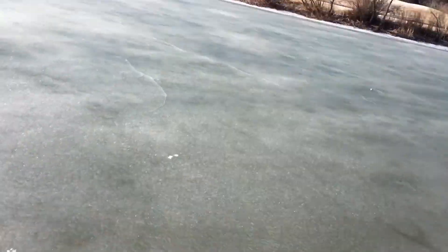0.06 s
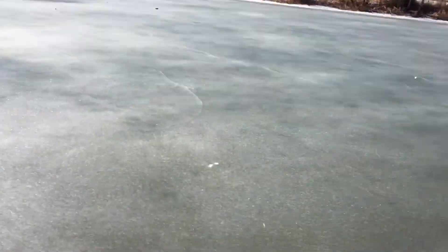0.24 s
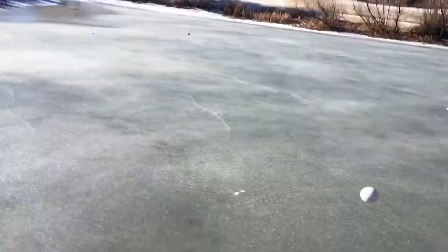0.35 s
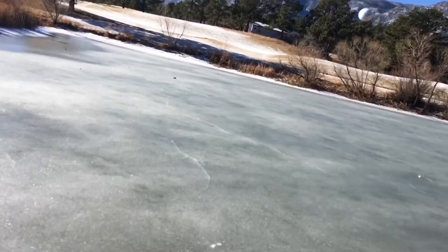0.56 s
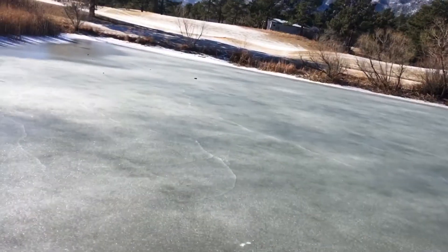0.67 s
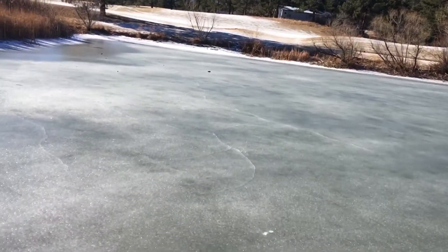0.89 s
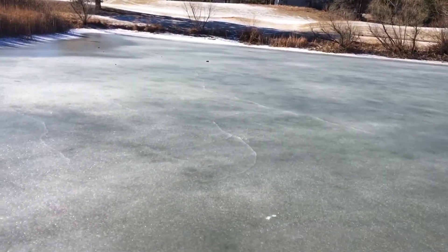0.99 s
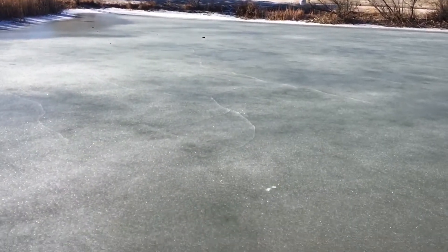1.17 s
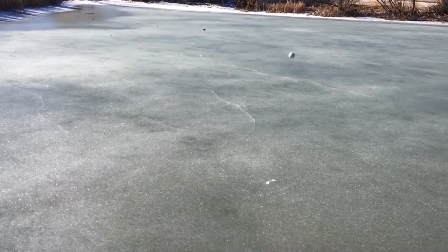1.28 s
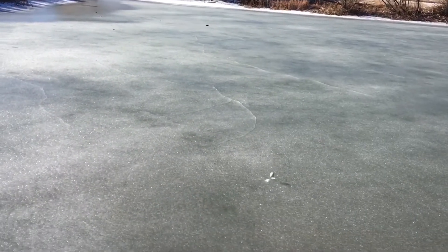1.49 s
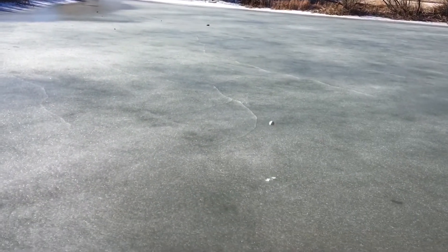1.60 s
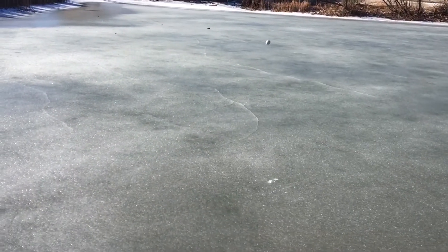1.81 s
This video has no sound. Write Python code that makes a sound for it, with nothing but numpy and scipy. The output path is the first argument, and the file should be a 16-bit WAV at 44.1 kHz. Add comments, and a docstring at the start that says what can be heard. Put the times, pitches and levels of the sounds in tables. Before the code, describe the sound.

A rock hits a frozen lake close by at 0.25 seconds, just after a soft arm swish: a hard crack and crunch with a low boom. Ice chips and tiny rising chirps scatter until 0.7 seconds, with light microphone knocks near 0.45. At 1.6 seconds the rock lands farther off with a quick falling pew, a crack and a short ring. Faint wind rumble and hiss continue throughout.

```python
"""Rock on a frozen lake

An arm swishes and a rock hits the ice close by: a hard crack and crunch, a low boom,
a scatter of chips and rising chirps. The rock bounces high and lands further off, where a falling
'pew', a bending wave carried treble first by the ice sheet, arrives just before the crack.
Light wind, a soft hiss and a few handling knocks reach the microphone."""
import sys
import numpy as np
from scipy import signal
from scipy.fft import rfft, irfft
from scipy.io import wavfile

SR = 44100
rng = np.random.default_rng(int(sys.argv[2]) if len(sys.argv) > 2 else 0)


def put_to_file(sound):
    """Save the sound as 16-bit audio at rate SR, in the file named by the first command-line argument."""
    columns = np.atleast_2d(sound).T  # one column per channel
    safe = np.clip(columns, -1, 1)
    whole_steps = np.round(safe * 32767)
    wavfile.write(sys.argv[1], SR, whole_steps.astype(np.int16))


N = 81585
T = np.arange(N) / SR

# wind rumble, distant air, crackly hiss, smooth hiss after the landing: f/Hz, level/dB
WIND_EQ = [(20, -31.5), (35, -10), (55, 1), (85, 0.5), (120, -16), (180, -16.5), (250, -33.5), (600, -41.5)]
AIR_EQ = [(100, -3), (350, 5), (700, -5.5), (1400, -3.5), (2400, -18), (3400, -19), (6000, -20.5),
          (16000, -23.5)]
HISS_EQ = [(200, 6.5), (1200, 0), (2400, -0.5), (3400, 0.5), (5000, -3), (6300, -2.5), (8000, -8),
           (10500, -9.5), (12000, -11.5), (16000, -9)]
LATE_HISS_EQ = [(150, 14), (350, 12), (700, 3), (1400, 0), (2400, -3), (3500, 2), (5000, -3), (6500, -2),
                (8500, -6), (12000, -6), (16000, -9)]
# puffs of wind: t/s, level/dB, half length/s
PUFFS = [(0.213, -34.5, 0.037), (0.937, -35, 0.012), (1.043, -47, 0.012), (1.114, -41.5, 0.019)]
# fader ride of the crackly hiss: t/s, level/dB
HISS_RIDE = [(0, -61), (.06, -58), (.085, -49.5), (.12, -54), (.22, -53), (.41, -61), (.46, -52.5),
             (.62, -53.5), (.7, -63), (.9, -66.5), (1.3, -76), (1.85, -76)]
# ticks of grit and ice chips: t/s, level/dB, f/Hz
TICKS = [(.08, -43.5, 5900), (0.2193, -22.5, 3300), (0.229, -33, 2940), (0.321, -29, 3020),
         (0.342, -40, 6000), (.556, -45.5, 2000), (.601, -43.5, 8000), (.627, -43.5, 8030),
         (.66, -50, 3530), (.8, -57, 4000), (.99, -56, 5000), (1.087, -53.5, 3486), (1.135, -55, 4540),
         (1.262, -58, 4540), (1.286, -55, 2980), (1.421, -52.5, 12100), (1.69, -45, 1100)]
# tone of one tick: multiple of its pitch, level/dB
TICK_EQ = [(.25, -26), (.7, 1), (1, 1), (1.9, -0.5), (3, -21.5)]
# air around the swinging arm: f/Hz, level/dB
SWISH_EQ = [(60, 3), (200, 5), (550, 0), (1000, -8), (2200, -13), (3500, -14), (7000, -20), (16000, -28)]
# rising chirps in the ice: t/s, level/dB, f/Hz, half length/s
ICE_CHIRPS = [(0.237, -35.5, 2540, 0.004), (0.337, -45, 3380, 0.0029), (.346, -45.5, 1480, 0.003),
              (0.378, -45, 2180, 0.0027), (.411, -50, 1670, 0.0027), (0.536, -47.5, 1210, 0.0049),
              (0.557, -40.5, 2000, .002), (0.566, -52, 5850, 0.0014), (.572, -45, 2900, 0.0014),
              (0.6104, -39.5, 4000, 0.00094), (.631, -41.5, 2510, .0022), (0.663, -48.5, 1860, 0.0015),
              (0.682, -49.5, 580, 0.0029)]
# the flutter that roughens them: f/Hz, level/dB
FLUTTER_EQ = [(100, -3), (600, -0.5), (1400, -11.5)]
# bending waves, each at its peak: t/s, level/dB, f/Hz, half length/s
BENDING_WAVES = [(0.2421, -5.5, 2230, 0.00054), (0.2456, -4.5, 417, 0.00087), (.2525, -12, 236, .002),
                 (.3208, -31, 1940, 0.00072), (1.5905, -4.5, 696, 0.0013), (1.5953, -24, 1300, .001),
                 (1.6085, -28.5, 788, 0.002), (1.618, -28, 540, 0.0032), (1.629, -35.5, 620, 0.0023),
                 (1.692, -29.5, 620, 0.0005)]
# rock meets ice: t/s, level/dB, tilt/(dB per octave)
HITS = [(0.2422, -2.5, -7), (.2454, -1.5, -14.5), (.2575, -16, -7), (1.5917, -12.5, 1)]
# ring of one hit: f/Hz, level/dB, t60/s
HIT_MODES = [(3150, -13.5, 0.011), (3355, -0.5, 0.015), (3804, -6.5, .008), (4840, -4.5, .006),
             (5336, -8, 0.0052), (6300, -6.5, .005), (7900, -10.5, .0045), (9300, -2, .003),
             (11560, -0.5, 0.003), (13100, -9, .0035), (15500, -18, .003)]
# crushed ice and its fine spray: f/Hz, level/dB
CRUNCH_EQ = [(150, -3), (400, 4), (1200, -1.5), (2600, -8), (3300, 2.5), (4200, -2.5), (6400, -0.5),
             (7800, -18.5), (12000, -16.5), (16000, -22)]
SPRAY_EQ = [(200, 2), (400, 4), (800, -4), (1400, -1), (2600, -6.5), (3350, -0.5), (3900, -2), (4600, 3.5),
            (6400, -5), (8000, -18.5), (16000, -23)]
# low boom of the first strike, with a bright 3.3 kHz microphone ring: f/Hz, level/dB, t60/s
BOOM_MODES = [(138, -6, .17), (275.7, 3, 0.072), (471.4, 0, .07), (652, -10, .06), (848, 5, 0.069),
              (1052.5, -3, 0.069), (1615, -1.5, 0.043), (1733, -6, .04), (1983, -5, .035),
              (3040, -2.5, .05), (3355, 5.5, .055), (4460, -7, .06), (4760, -8.5, .06), (6230, -8, .05)]
# knocks on the microphone: t/s, ring level/dB, thump level/dB
HAND_KNOCKS = [(.4408, -24, -27), (.465, -33.5, -43.5), (0.4794, -22.5, -42)]
# ring of its housing: f/Hz, level/dB, t60/s
HOUSING_MODES = [(930, 0.5, .05), (786, -7, 0.03), (1580, -19.5, 0.032)]
# hand rubbing the housing: f/Hz, level/dB
RUB_EQ = [(40, -14), (110, 0), (230, -3), (330, -21), (500, -45), (2000, -45)]
# body and bright edge of the sheet's ring: f/Hz, level/dB
SHEET_BODY_EQ = [(120, -32), (240, -4), (480, 5), (700, -6), (1000, -18), (1400, -38), (2200, -49),
                 (2800, -34), (3300, -18.5), (4300, -34), (6500, -30.5), (8500, -33), (16000, -36.5)]
SHEET_EDGE_EQ = [(500, -6), (850, 4.5), (1300, 3.5), (1650, -3), (2200, -27), (2800, -40), (3400, 0.5),
                 (4400, -18.5), (6500, -13.5), (8500, -27.5), (11500, -21), (16000, -32)]

STRIKE_S, LANDING_S = .2425, 1.593


def from_db(db):
    """Decibels to gain."""
    return 10 ** (np.asarray(db) / 20)


def colour(x, eq):
    """Shape x with an EQ curve that rolls off past both ends; rms 1."""
    hz, db = np.transpose(eq)
    f = np.maximum(np.fft.rfftfreq(N, 1 / SR), 1)
    gain = from_db(np.interp(np.log(f), np.log(hz), db))
    rolloff = (1 + (hz[0] / f / 2) ** 4) * (1 + (f / hz[-1] / 2) ** 4)
    y = irfft(rfft(x) * gain / rolloff, N)
    return y / y.std()


def noise(eq):
    """Smooth coloured noise; rms 1."""
    return colour(rng.standard_normal(N), eq)


def grains(eq, per_s, spread_db):
    """Random clicks of uneven size, coloured; rms 1."""
    sizes = from_db(spread_db * np.minimum(rng.exponential(1, N), 4)) * rng.choice([-1, 1], N)
    return colour(sizes * (rng.random(N) < per_s / SR), eq)


def fade(s, t60, hold=0):
    """Hard attack at s seconds, hold, exponential decay."""
    return (T >= s) * from_db(-60 * np.clip((T - s - hold) / t60, 0, 4))


def swell(s, width):
    """Bell-shaped envelope peaking at s; width is its half length in seconds."""
    return np.exp(-.5 * np.minimum(((T - s) / width) ** 2, 100))


def ring(s, hz, t60):
    """One struck mode."""
    return fade(s, t60) * np.sin(2 * np.pi * hz * (T - s))


def struck_body(s, modes):
    """Modes struck together, alternating in polarity."""
    return sum((-1) ** k * from_db(db) * ring(s, hz, t60) for k, (hz, db, t60) in enumerate(modes))


def glide(s, hz, width, slope):
    """A short dispersed wave: around its peak the pitch slides by the share slope per half length."""
    u = np.clip((T - s) / width, -4, 4)
    cycles = hz * width * u / np.maximum(1 - slope * u / 2, .1)
    return swell(s, width) * np.sin(2 * np.pi * cycles)


def wind():
    """Light wind rumbles on the microphone, with a few puffs."""
    puffs = sum(from_db(db) * swell(s, width) for s, db, width in PUFFS)
    return (from_db(-42.5) + puffs) * noise(WIND_EQ)


def air_bed():
    """Distant air, a faint crackle that dies away, and a hiss that stays after the landing."""
    crackle = from_db(np.interp(T, *np.transpose(HISS_RIDE))) * grains(HISS_EQ, per_s=9000, spread_db=4.5)
    late_hiss = from_db(-56) * (T >= LANDING_S) * noise(LATE_HISS_EQ)
    return from_db(-61.5) * noise(AIR_EQ) + crackle + late_hiss


def chips():
    """Grit and ice chips tick, each a tiny noise burst in its own register."""
    return sum(from_db(db) * fade(s, t60=.0078) * noise([(hz * k, level) for k, level in TICK_EQ])
               for s, db, hz in TICKS)


def arm_swish():
    """The throwing arm sweeps the air: one soft swell of noise."""
    return from_db(-36.5) * swell(.16, width=.021) * noise(SWISH_EQ)


def chirps():
    """Small upward sweeps in the ice, made ragged by random flutter."""
    sweeps = sum(from_db(db) * glide(s, hz, width, slope=.18) for s, db, hz, width in ICE_CHIRPS)
    return sweeps * (1 + .8 * noise(FLUTTER_EQ))


def pews():
    """Bending waves cross the sheet treble first, so each one dives in pitch."""
    return sum(from_db(db) * glide(s, hz, width, slope=-.28) for s, db, hz, width in BENDING_WAVES)


def cracks():
    """Every hit rings the same short, bright modes, which radiate no bass."""
    pivot_hz, low_cut_hz = HIT_MODES[1][0], 3190
    rings = sum(from_db(db + mode_db + tilt * np.log2(hz / pivot_hz)) * ring(s, hz, t60)
                for s, db, tilt in HITS for hz, mode_db, t60 in HIT_MODES)
    return signal.sosfilt(signal.cheby1(6, 1, low_cut_hz, "high", fs=SR, output="sos"), rings)


def crunch():
    """The first strike crushes the surface in a tight burst of grains."""
    crushed = grains(CRUNCH_EQ, per_s=9000, spread_db=3)
    return from_db(-16) * fade(STRIKE_S, t60=.055, hold=.01) * crushed


def spray():
    """Fine ice sprays from the strike; a thin 3.3 kHz microphone resonance rings on."""
    mic_hz, bandwidth_hz = 3334, 190
    patter = grains(SPRAY_EQ, per_s=3200, spread_db=4)
    thin = signal.lfilter(*signal.iirpeak(mic_hz, mic_hz / bandwidth_hz, fs=SR), patter)
    mic_ring = from_db(-46.5) * fade(STRIKE_S, t60=1.2) * thin / thin.std()
    return from_db(-34.5) * fade(STRIKE_S, t60=.47) * patter + mic_ring


def boom():
    """Low boom of the first strike, with a bright 3.3 kHz microphone ring."""
    return from_db(-19.5) * struck_body(.2447, BOOM_MODES)


def handling():
    """A hand knocks on the microphone's housing, each knock a ring and a thump, then rubs it."""
    rise_s, thump_delay_s = .0012, .00907
    knocks = 0
    for s, ring_db, thump_db in HAND_KNOCKS:
        housing = from_db(ring_db) * struck_body(s, HOUSING_MODES)
        dull_ring = from_db(thump_db - 5) * ring(s, hz=380, t60=.06)
        attack = -np.expm1(-np.maximum(T - s, 0) / rise_s)
        thump = from_db(thump_db) * glide(s + thump_delay_s, hz=208, width=.0047, slope=-.23)
        knocks += attack * (housing + dull_ring) + thump
    rub = from_db(-35) * swell(.572, width=.028) * noise(RUB_EQ)
    return knocks + rub


def sheet_ring():
    """The sheet rings on after the landing; its bright edge dies first."""
    body = from_db(-31.5) * fade(LANDING_S, t60=.29) * noise(SHEET_BODY_EQ)
    edge = from_db(-22) * fade(LANDING_S, t60=.034) * noise(SHEET_EDGE_EQ)
    return body + edge


def scene():
    """Mono mix of all layers."""
    impacts = chips() + chirps() + pews() + cracks() + crunch() + spray() + boom() + sheet_ring()
    return (wind() + air_bed() + arm_swish() + handling() + impacts)[None]


def record(dry):
    """Peaks clip at full scale, then a steep high cut takes off the top."""
    high_cut_hz = 16000
    return signal.sosfilt(signal.ellip(12, .1, 90, high_cut_hz, fs=SR, output="sos"), np.clip(dry, -1, 1))


dry = scene()
out = record(dry)
put_to_file(out)
```